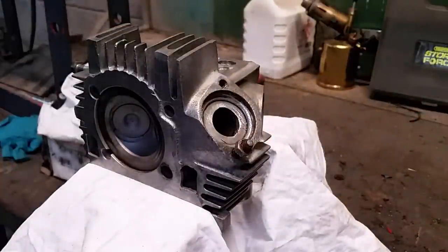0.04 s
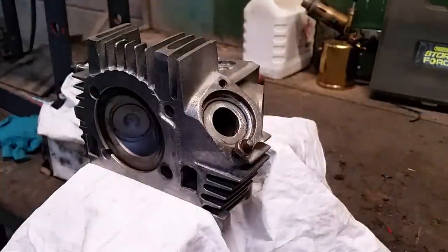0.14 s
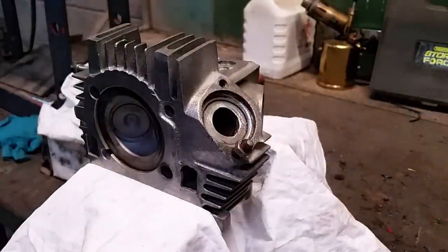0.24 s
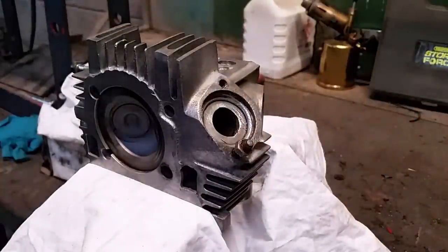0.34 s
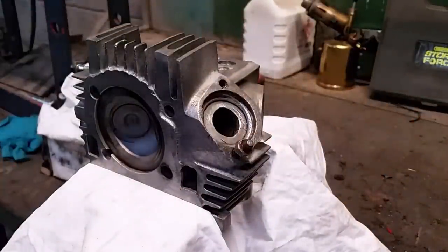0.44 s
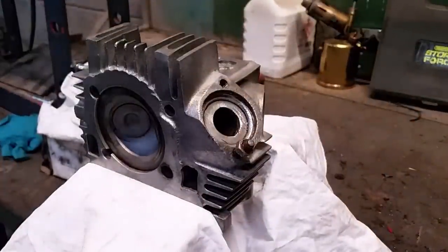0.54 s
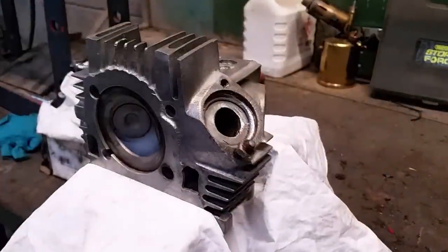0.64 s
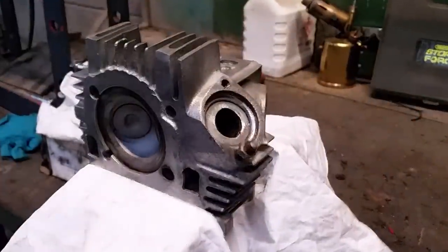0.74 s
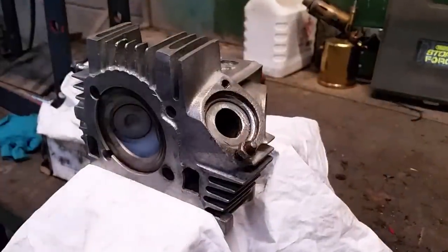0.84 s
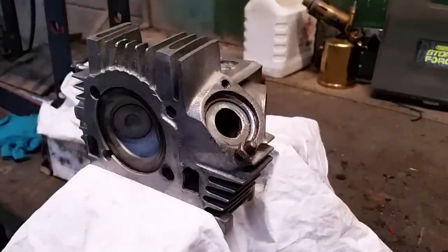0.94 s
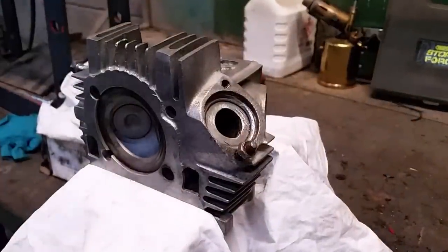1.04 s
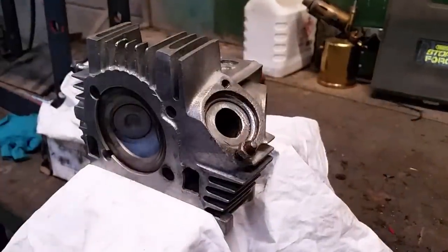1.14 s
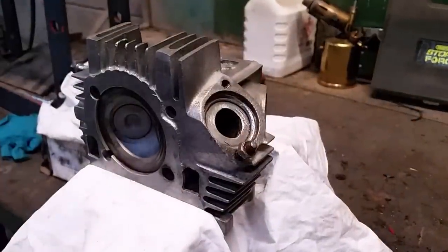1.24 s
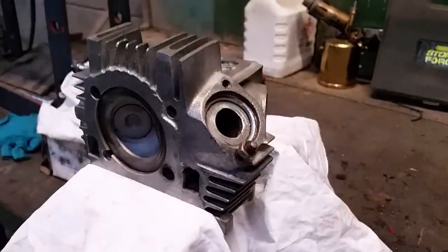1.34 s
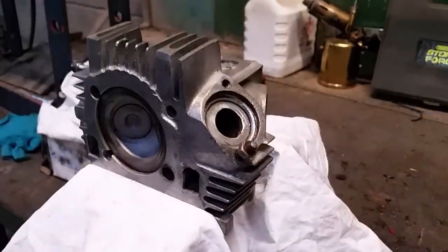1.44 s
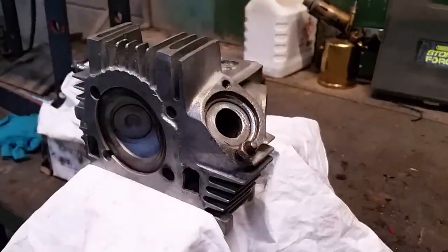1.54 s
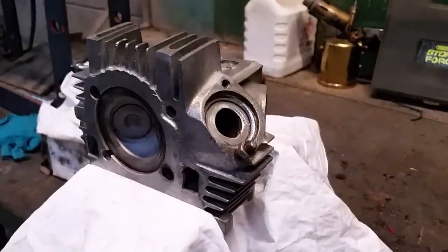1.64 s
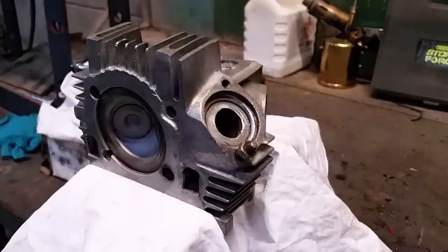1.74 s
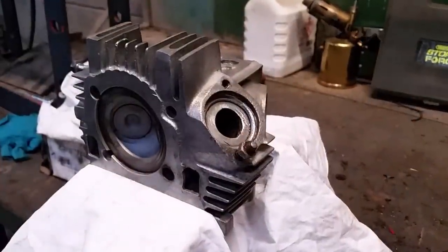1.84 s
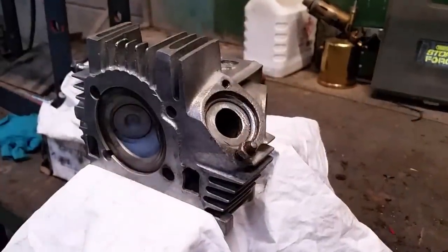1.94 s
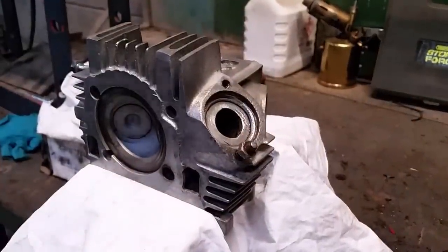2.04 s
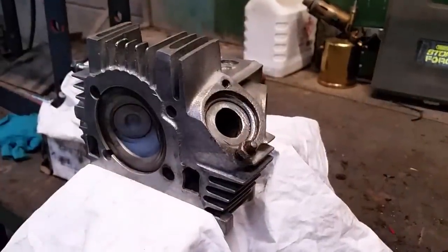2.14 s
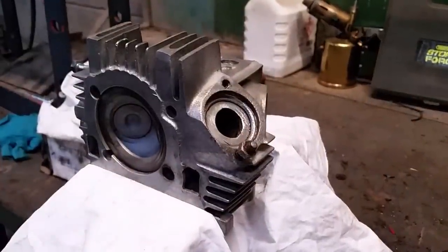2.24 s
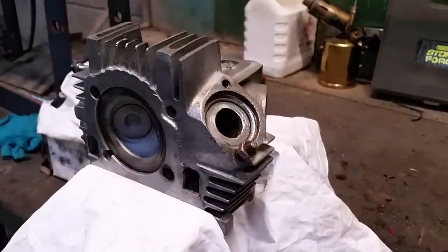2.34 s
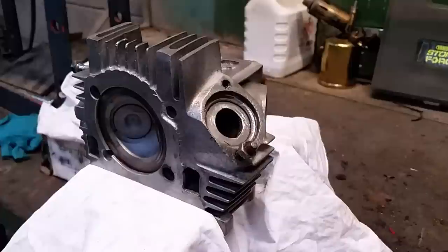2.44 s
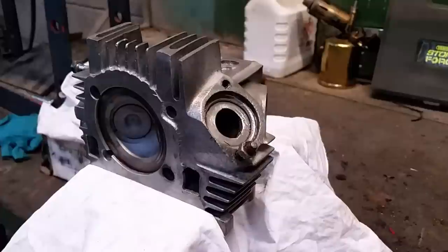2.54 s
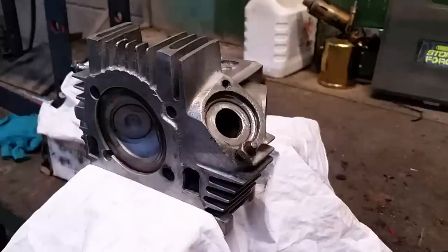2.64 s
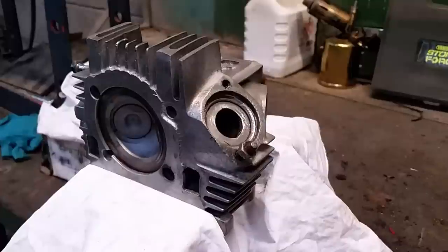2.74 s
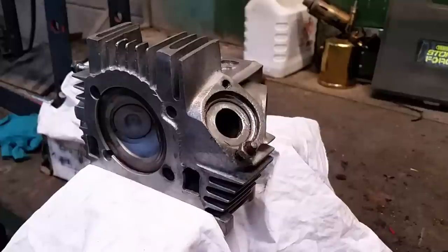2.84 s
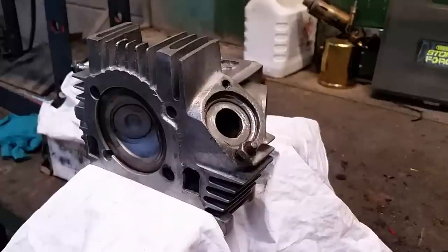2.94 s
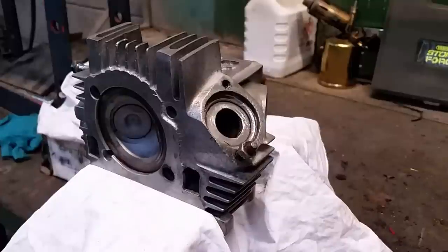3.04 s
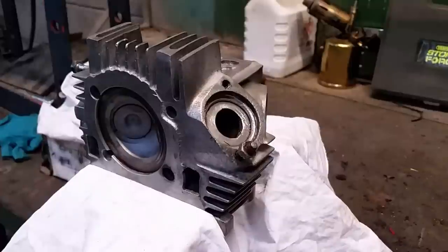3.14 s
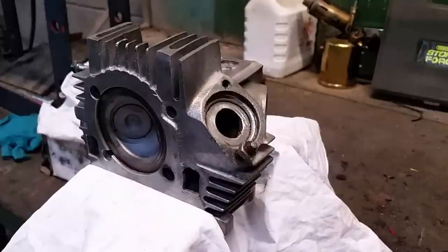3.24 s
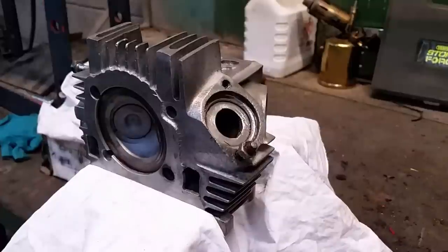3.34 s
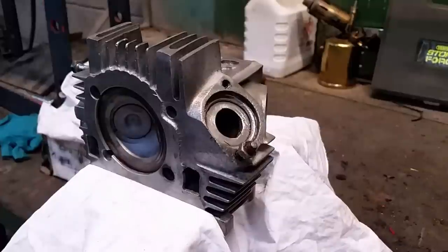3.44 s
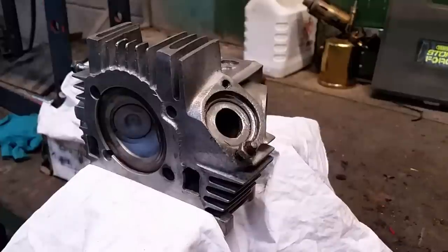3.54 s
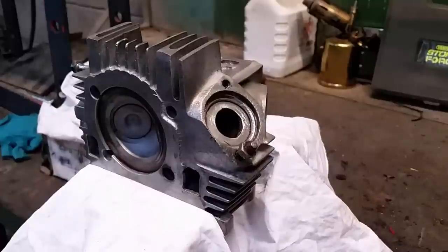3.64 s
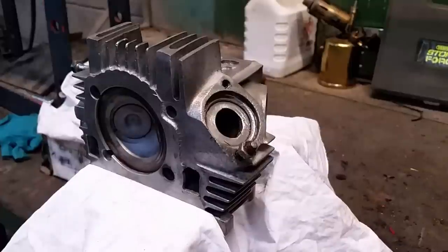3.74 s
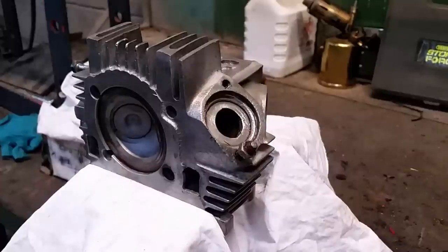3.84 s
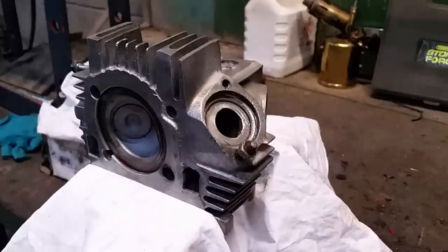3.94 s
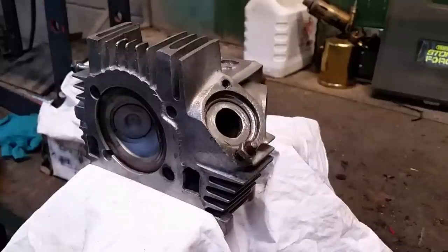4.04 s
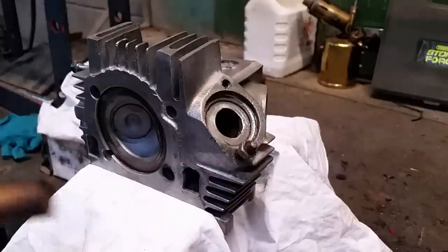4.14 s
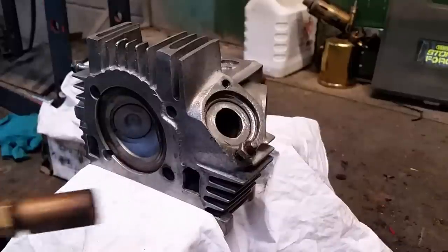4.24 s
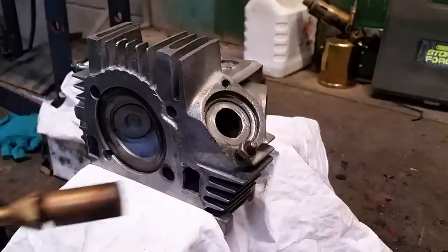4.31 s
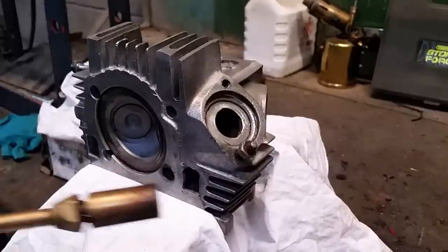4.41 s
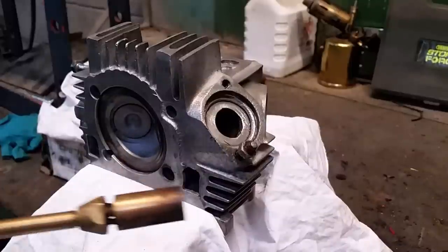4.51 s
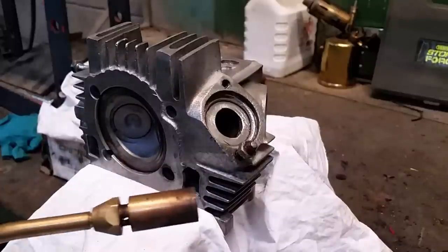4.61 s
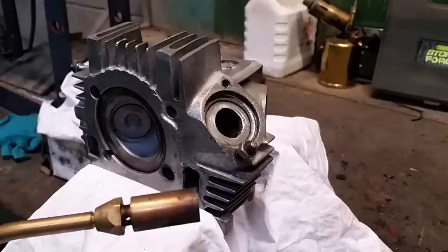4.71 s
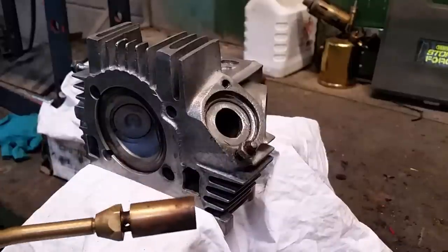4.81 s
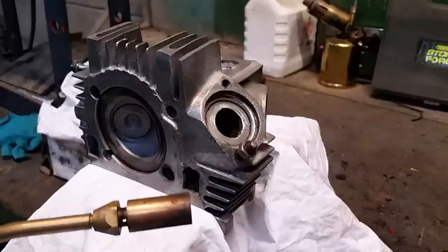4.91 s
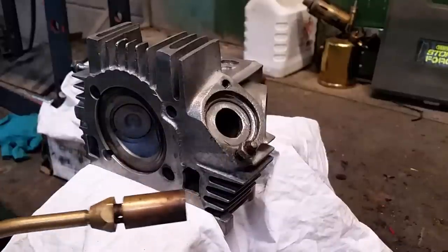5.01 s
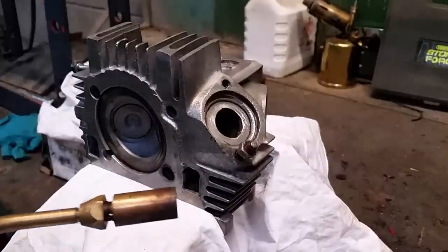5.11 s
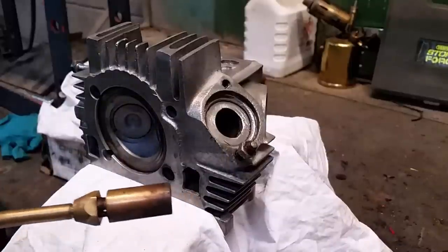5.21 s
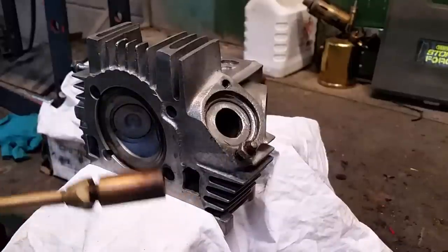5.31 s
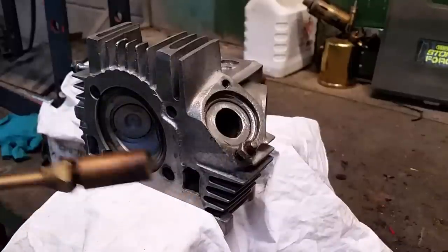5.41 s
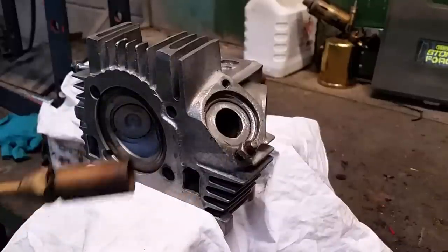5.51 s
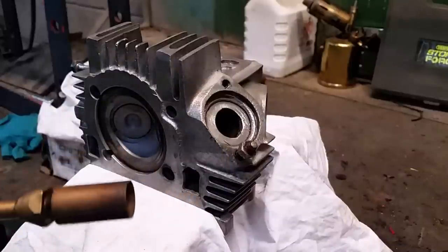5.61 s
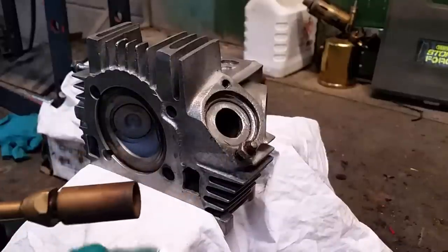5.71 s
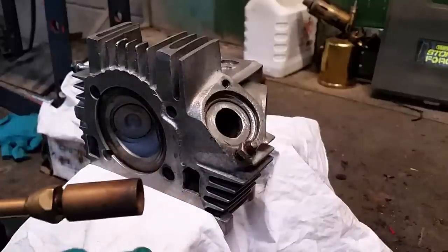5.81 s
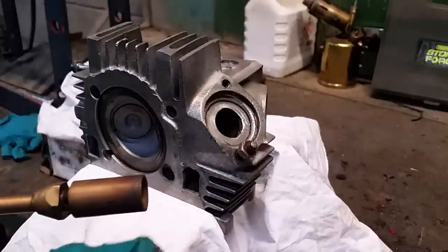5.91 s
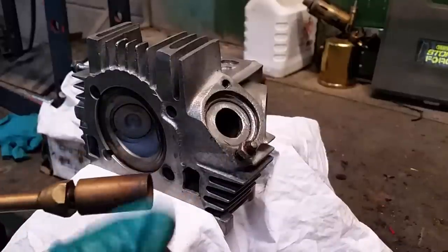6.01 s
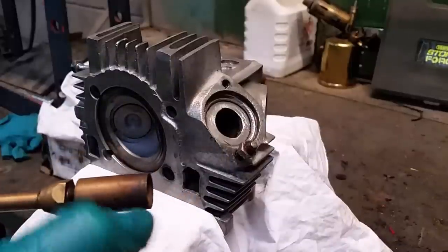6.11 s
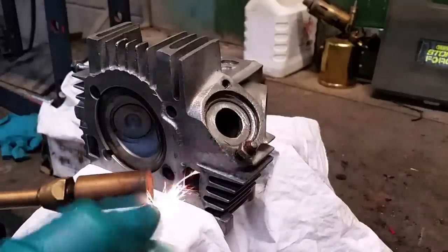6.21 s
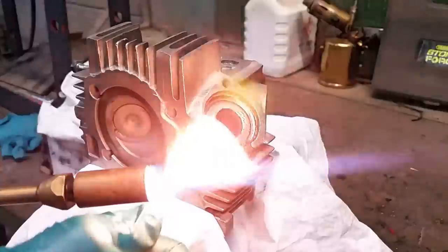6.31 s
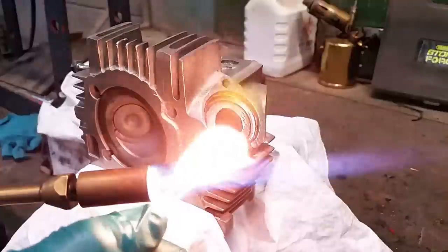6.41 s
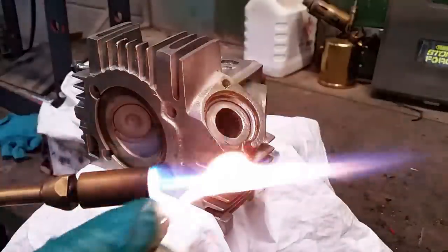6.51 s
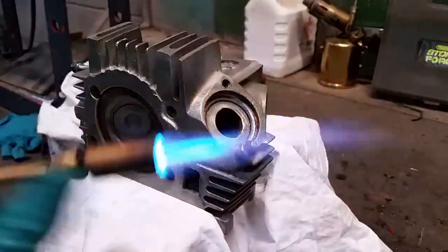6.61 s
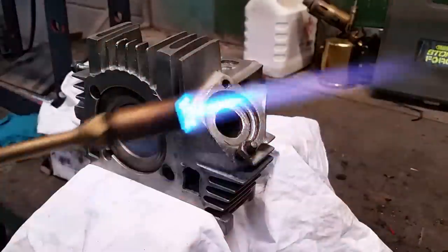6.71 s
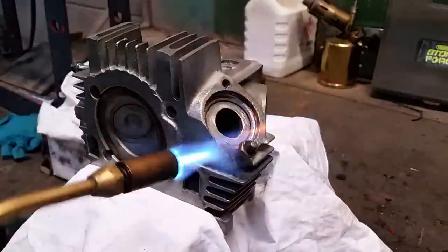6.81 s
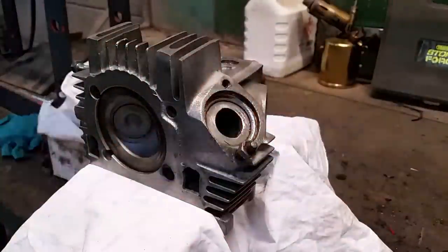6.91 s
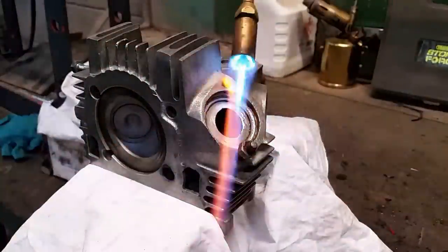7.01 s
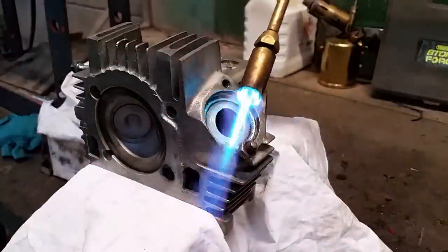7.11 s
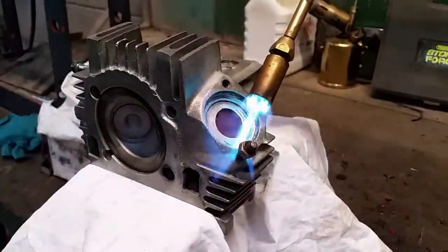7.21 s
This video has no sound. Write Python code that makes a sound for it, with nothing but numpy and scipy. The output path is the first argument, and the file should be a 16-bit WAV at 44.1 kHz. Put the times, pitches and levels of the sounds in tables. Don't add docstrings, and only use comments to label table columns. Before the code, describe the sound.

A small workshop with faint low rumble and a short room echo, heard close by in stereo. From 0 to 0.6 s, tiny hard clicks, the sharpest at 0.45. At 0.79 a tool tips with a knock, lands hard on bench boards at 0.86 with an instant rebound, and bounces at 0.93 and 1.0. From 1.15 to 2.9 s, faint glove and cloth rustle, a soft bump at 1.42, a crisp click and light knock at 2.17, little taps. Near quiet until 3.55, when gas begins hissing, swelling to a bright, airy whistle around 4.05. Boot and hose scuffs at 4.25 and 4.85; the hiss sinks until 5.2, then rises strongly by 5.7. A flint scrapes sharply at 5.86 and again at 6.35. At 6.37 the gas catches with a deep pop and becomes a loud, fluttering, broad roar, dipping slightly near 7.0 and continuing to the 7.26 s cut.

```python
import sys
import numpy as np
from scipy import signal
from scipy.fft import rfft, irfft
from scipy.io import wavfile
from scipy.ndimage import uniform_filter1d, map_coordinates

SR = 44100
rng = np.random.default_rng(int(sys.argv[2]) if len(sys.argv) > 2 else 0)


def decibels_to_gain(level_db):
    exponent = np.asarray(level_db, float) / 20
    return 10 ** exponent


def dump_mix(stems):
    frames = np.atleast_2d(stems).T
    limited = np.clip(frames, -1, 1)
    pcm = np.round(limited * 32767).astype(np.int16)
    wavfile.write(sys.argv[1], SR, pcm)


N = 320166
T = np.arange(N) / SR


def shape(x, table, top=0):
    hz = np.maximum(np.fft.rfftfreq(x.shape[-1], 1 / SR), 1)
    f, db = np.transpose(table)
    gain = decibels_to_gain(np.interp(np.log(hz), np.log(f), db) + top)
    return irfft(rfft(x) * gain, x.shape[-1])


def band(x, lo_hz, hi_hz, order=2):
    sos = signal.butter(order, [lo_hz, min(hi_hz, .45 * SR)], "band", fs=SR, output="sos")
    return signal.sosfilt(sos, x)


def below(x, hz):
    return signal.sosfiltfilt(signal.butter(4, hz, fs=SR, output="sos"), x)


def unit(x, lo_hz, hi_hz):
    return x / np.std(band(x[..., :2 * SR], lo_hz, hi_hz, order=4))


# pitch in Hz, unshared part in dB.
PORT_SIDE = [(30, -14), (100, -20), (200, -22), (500, -21), (1500, -16), (3000, -12), (5000, -7),
             (10000, -12), (15000, -16)]


def pair(x):
    unshared = shape(np.roll(x, len(x) // 3), PORT_SIDE)
    return x + unshared * np.array([[1], [-1]])


def gains(table):
    s, *cols = np.transpose(table)
    return [decibels_to_gain(np.interp(T, s, c, left=-130, right=-130)) for c in cols]


def walk(rate):
    k = int(SR / rate)
    steps = np.repeat(rng.standard_normal(N // k + 1), k)
    w = uniform_filter1d(uniform_filter1d(steps, k), k)[:N]
    return w / w.std()


def grains(rate, scatter_db):
    x = (rng.random(N) < rate / SR) * decibels_to_gain(scatter_db * rng.exponential(size=N))
    return x - x.mean()


def burst(s, rise, tail):
    return np.exp(-np.where(T < s, (s - T) / rise, (T - s) / tail))


def add(out, s, x):
    i = int(s * SR)
    out[:, i:i + x.shape[1]] += x[:, :N - i]


# pitch in Hz, strength in dB per Hz.
SHOP_COLOUR = [(12, -43.5), (20, -21), (27, -21.5), (35, -10.5), (48, -7.5), (70, 0), (87, -23),
               (109, -1.5), (129, -6), (163, -11), (393, -24.5), (505, -25), (1200, -37), (3000, -59),
               (3900, -108.5), (6600, -120)]
# time in seconds, level in dB.
SHOP_LEVEL = [(0.0, -61.5), (0.6, -51.5), (0.95, -59.5), (1.6, -52), (2.04, -57), (2.34, -53),
              (2.55, -57.5), (3.09, -62.5), (3.54, -59.5), (3.8, -53), (4.27, -51), (6.3, -50.5),
              (6.5, -48.5), (7.26, -45.5)]


def shop():
    rumble = pair(shape(rng.standard_normal(N), SHOP_COLOUR))
    return gains(SHOP_LEVEL)[0] * decibels_to_gain(walk(6)) * unit(rumble, 27, 350)


# time in seconds, strength of movement in dB, lightness of touch as treble tilt in dB.
RUSTLE = [
    [(0.0, -88, 1), (0.154, -86, -5), (0.27, -86, -8), (0.4, -82, -1)],
    [(1.15, -80, -4), (1.45, -76.5, -13.5), (1.59, -72.5, 1.8), (1.86, -76, -2.2), (1.95, -93, 7),
     (2.16, -74.5, -8), (2.29, -85, 2), (2.39, -70, -9)],
    [(2.39, -71, -7.5), (2.59, -81.5, -7), (2.76, -80, -1), (2.94, -95, -7), (3.4, -97, 3)],
]


def rustle():
    mid_db = -2
    touch = [[(s, db + tilt, db + tilt / 2 + mid_db, db - tilt) for s, db, tilt in spell] for spell in RUSTLE]
    high, mid, low = (sum(g) for g in zip(*map(gains, touch)))
    crackle = pair(rng.standard_normal(N) * decibels_to_gain(2 * walk(60)))
    edges = ((high, 9000, 15500), (mid, 3000, 7500), (low, 400, 2500))  # gain, lowest Hz, highest Hz
    return sum(g * unit(band(crackle, lo, hi), lo, hi) for g, lo, hi in edges)


# time in seconds, peak in dB, treble lift in dB, share of the room in dB.
CLICKS = [(0.0855, -60, -10, -3), (0.18, -63, -5, -4), (0.2022, -44.5, 18.5, -12),
          (0.209, -50.5, -3.5, 6.5), (0.055, -68, -8, -6), (0.157, -68, -15, -6), (0.247, -62, -10, -6),
          (0.283, -62, -8, -6), (0.289, -60, -8, -6), (0.4174, -41, 17.5, -14), (0.4364, -46, 6, 14),
          (0.449, -33, 10, 6), (0.4541, -22.5, 12.5, -19), (0.568, -44, -18, 7.5), (1.4546, -49, 5, -6),
          (1.4775, -42.5, -3, -0.5), (1.577, -53, -20, 1), (1.6312, -63, 14, -3), (1.8032, -40, -10, -10),
          (1.8496, -54, -15, -4), (2.165, -27, 11, -46.5), (2.4362, -64, 6, -6), (2.4826, -51, -12, -8),
          (2.5031, -50, -14, -8), (2.565, -70, 7.5, -8), (2.6577, -52, 6, -6), (2.691, -56, 0, -6),
          (2.862, -68, 8, -6), (2.9067, -72, 6, -6), (3.85, -46, 6, -6), (4.0114, -36, -4, -6),
          (6.153, -31, -8, -12)]
# time in seconds, peak in dB, treble lift in dB, share of the room in dB.
TAPS = [(0.392, -61, -5, 6.5), (0.783, -52, -12, -6), (0.7865, -38, -10, -5), (0.855, -46, -15, -6),
        (0.8605, -28, -4, -6), (0.8635, -32, 3, 0), (0.931, -38, -4, -8), (0.94, -40, -6, -4),
        (0.9695, -62, 14, -10), (0.9955, -41, -3, -3), (1.0243, -52, 6, -3), (1.0365, -50, -15, -5),
        (1.0825, -58, 11, 5), (1.124, -60, 10, 0), (1.4036, -50, -15, -3), (1.3954, -60, -9, 2),
        (2.1154, -54, -25, -12), (2.472, -56, -1.2, 4.5), (2.552, -46.5, 1, -9), (2.692, -57, -20, -8),
        (2.771, -66, -20, -8)]


def clicks():
    out, t = np.zeros((2, N)), np.arange(1500) / SR
    # rows, level of the 1-3 kHz body in dB, length of a crack in seconds
    for rows, body_db, length in ((CLICKS, -22, .0008), (TAPS, 1.5, .0012)):
        for (s, db, lift_db, wet_db), noise in zip(rows, rng.standard_normal((len(rows), 1500))):
            crack = np.array([noise * t / length * np.exp(-t / length), t == 0])
            parts = band(crack, 9000, 16000), band(crack, 2800, 7500), band(crack, 1000, 2800)
            mix = 0
            for x, part_db in zip(parts, (lift_db, 0, body_db)):
                wet = decibels_to_gain(wet_db) * x[0].std() / x[1].std()
                level = decibels_to_gain(db + part_db) / abs(x[0]).max() * np.array([1, wet])
                mix = mix + level[:, None] * x
            add(out, s, mix)
    return out


# time in seconds, peak in dB, contact in seconds, pitch factor, share of the room in dB.
KNOCKS = [
    (0.7873, -14.5, 0.0011, 0.92, -5.5),
    (0.8582, -22, .0004, 1.05, -6),
    (0.8606, -7, 0.00045, 1.0, -5),
    (0.8632, -13, .0003, 1.05, -10),
    (0.929, -12.5, .0008, 0.9, -6),
    (.940, -19, .001, 0.98, -10),
    (.995, -20, .001, 0.855, -2.5),
    (1.4188, -29, 0.0024, 0.597, -6.5),
    (2.165, -30, 0.0011, 0.66, -15),
]
# pitch in Hz, strength in dB, seconds to fade by 60 dB.
BENCH = [(150, -12, 0.12), (265, -3, 0.08), (372, 7.5, 0.07), (602, -7, 0.06), (802, -1, 0.06),
         (1150, -3, .04), (1375, 5.5, .03), (1690, -0.5, 0.057), (2000, -5, 0.09), (2820, -13, 0.068),
         (3980, -15, 0.06)]


def knocks():
    out, t = np.zeros((2, N)), np.arange(9000) / SR
    hz, db, t60 = np.transpose(BENCH)[:, :, None]
    thud = band(t == 0, 300, 2200, order=3)
    lucks = rng.standard_normal((len(KNOCKS), len(hz), 1))
    for (s, peak_db, contact, pitch, wet_db), luck in zip(KNOCKS, lucks):
        fade_s = t60 * (.96 + .0254 * peak_db)
        modes = decibels_to_gain(db + luck) * np.sin(2 * np.pi * hz * pitch * t) * 1000. ** (-t / fade_s)
        push = t[:600] * np.exp(-t[:600] * 4 / contact)
        blow = -signal.fftconvolve(modes.sum(axis=0), push)[:9000]
        blow = band(blow, 110, 8000, order=1)
        spread = 0.5 * blow + 0.7 * thud * blow.std() / thud.std()
        add(out, s, decibels_to_gain(peak_db) / abs(blow).max() * np.array([blow, decibels_to_gain(wet_db) * spread]))
    return out


SCUFFS = { (9500, 15100): [(1.13, -64, .02, 0.064), (1.575, -65.5, 0.0083, 0.013),
          (1.665, -63, 0.019, 0.018), (1.785, -52.5, 0.015, 0.007), (2.164, -36, 0.0035, 0.0013),
          (2.659, -52.5, 0.009, 0.014), (2.72, -66.5, .01, .015)],
          (3000, 15300): [(1.471, -60, 0.017, 0.016), (2.162, -52, 0.013, 0.018)],
          (3300, 7500): [(1.792, -56, 0.016, 0.013), (2.168, -43, 0.0029, 0.0037),
          (2.49, -69, 0.031, 0.014), (2.665, -63.5, 0.0094, 0.03)],
          (1100, 2600): [(1.41, -63, 0.011, 0.058), (2.37, -65, 0.0078, 0.037), (5.22, -66, .02, .03),
          (4.845, -56, 0.006, 0.03)], (230, 750): [(1.419, -45.5, 0.0067, 0.03),
          (4.838, -45, 0.003, 0.058)], (2300, 3300): [(4.25, -44, .025, .02)],
          (1330, 1530): [(4.25, -50, .025, .015)], (510, 610): [(4.255, -39, .03, .008)],
          (310, 390): [(4.23, -43, .015, .025), (4.845, -44, .006, .03)],
          (500, 1300): [(4.85, -46, .008, .05), (4.245, -50, .03, .02)],
          (130, 320): [(1.425, -44, .008, .04), (4.95, -52, .02, .02)],
          (150, 2400): [(5.866, -41, .003, 0.021), (6.352, -36, 0.0027, 0.0048)], }


def scuffs():
    grit = rng.standard_normal(N) * decibels_to_gain(2 * walk(150))
    out = 0
    for (lo, hi), rows in SCUFFS.items():
        drag = sum(decibels_to_gain(db) * burst(s, rise, tail) for s, db, rise, tail in rows)
        out = out + unit(band(grit, lo, hi), lo, hi) * drag
    return out


def resonance(hz, width_hz):
    sway = below(rng.standard_normal((2, N)), width_hz / 2)
    turn = 2 * np.pi * np.cumsum(hz) / SR
    return sway[0] * np.cos(turn) + sway[1] * np.sin(turn)


# time in seconds, flow as level of the tube in dB, nozzle turned away in dB.
JET = [(3.4, -104, 3), (3.56, -77, 3), (3.8, -67, -5), (3.91, -60.5, -3.5), (4.04, -50.5, -1.5),
       (4.18, -52, -3), (4.44, -54, 0.3), (4.65, -57.5, 3), (4.91, -58, 6.5), (5.16, -61, 2.5),
       (5.38, -56.5, 1.5), (5.47, -50.5, -2.1), (5.64, -43.5, -1.5), (5.77, -40.5, 2), (6.16, -43, -2.5),
       (6.37, -41, 0.7), (6.6, -40.5, .5), (6.8, -42, 1), (6.98, -42, .5), (7.04, -45, 4), (7.26, -44.5, 3)]
# pitch in Hz, strength in dB per Hz.
JET_COLOUR = [(1470, -41), (2500, -22.5), (3530, -21), (4640, -4.5), (5860, -8.5), (6190, -17), (6800, -9),
              (7180, -9), (7950, -23), (9370, -23), (10500, -8.5), (11000, -5), (11700, -11),
              (12800, -11.5), (14200, -11), (15300, -12), (16200, -20)]
# pitch in Hz, strength in dB per Hz.
RUSH_COLOUR = [(150, -13), (250, -2.5), (700, -2), (1400, -9), (3500, -17), (6000, -20.5), (7500, -22),
               (9000, -46)]
# time in seconds, tube, collar and nozzle pitch in Hz.
AIM = [(3.55, 4880, 7250, 11500), (3.8, 4850, 7000, 10900), (4.05, 4880, 7100, 11050),
       (4.35, 4750, 6800, 11000), (4.58, 4880, 6800, 11350), (4.78, 4820, 6750, 11600),
       (5.3, 4890, 7050, 10950), (5.55, 4950, 7000, 10750), (5.8, 4800, 6900, 10800),
       (6.2, 4660, 7000, 11100), (6.55, 4700, 6900, 11250), (7.26, 4700, 6900, 11100)]
# time in seconds, collar over the tube in dB.
GRIP = [(4.1, 1.2), (4.6, -10.5), (5.45, -6), (5.7, -12), (5.97, -3), (6.3, -9)]


def jet():
    s, flow, away = np.transpose(JET)
    flow, away = np.interp(T, s, flow, left=-130), np.interp(T, s, away)
    lit = T >= POP[0][0]
    whistle = decibels_to_gain(flow + 8 - away)
    tube = decibels_to_gain(flow - 5 * lit)
    grip = np.interp(T, *np.transpose(GRIP))
    collar = decibels_to_gain(flow + grip - 3 * lit + 1.5 * walk(5))
    wash = np.minimum(burst(4.06, .05, 99), burst(4.06 + .27, 99, .15))
    opening = np.clip((T - s[1]) / 0.44, 0, 1) ** 2
    rush = decibels_to_gain(-41.5 + .5 * flow) * opening + decibels_to_gain(-56.5) * wash

    turns, *bends = np.transpose(AIM)
    rings = []
    for hz, width_hz in zip(bends, (700, 750, 850)):
        centre = np.interp(T, turns, hz) * (1 + .008 * walk(6))
        rings.append(resonance(centre, width_hz))
    hiss = shape(rng.standard_normal((4, N)), JET_COLOUR)
    bounce_ms = .72 - .058 * (T - s[0]) + .03 * walk(2)
    late = np.arange(N) - bounce_ms * SR / 1000
    high = hiss[2] + (.36 - .2 * lit) * map_coordinates(hiss[2], [late], order=3)
    skirts = below(hiss[0], 6100), band(hiss[1], 6000, 7600, order=4), band(high, 9900, 17000, order=5)

    broad = np.clip((whistle / decibels_to_gain(-56)) ** .65, .12, 1)
    gap = unit(pair(band(hiss[3], 7830, 10340, order=4)), 7400, 10000)
    out = whistle ** 1.495 * decibels_to_gain(1.5 + .55 * grip) * gap * ~lit
    clear = decibels_to_gain(-.1 * np.maximum(flow + 55, 0))
    for gain, ring, skirt, share in zip((tube, collar, whistle), rings, skirts, (.7, .6, .55)):
        flicker = decibels_to_gain(.7 * walk(25))
        sung = share * clear * ring / ring.std()
        out = out + gain * flicker * pair(sung + 0.78 * broad * skirt / skirt.std())
    air = unit(pair(shape(rng.standard_normal(N), RUSH_COLOUR)), 1360, 3400)
    flutter = decibels_to_gain(1.2 * walk(40))
    return out + rush * flutter * ~lit * air


# time in seconds, level in dB, run-up in seconds, tail in seconds.
FLINT = [
    (5.859, -27, .006, .01),
    (5.8622, -14, .0008, .0025),
    (6.3445, -22, .005, .002),
    (6.349, -19, .003, .004),
]
# pitch in Hz, strength in dB per Hz.
FLINT_COLOUR = [(88, -10), (150, -14), (1700, -28), (2200, -25.5), (4900, -11), (5850, -19), (6980, -13.5),
                (9000, -13), (10900, -10.5), (14400, -4), (16200, -33)]


def flint():
    grit = grains(15000, scatter_db=1.5)
    strokes = sum(decibels_to_gain(db) * burst(s, rise, tail) for s, db, rise, tail in FLINT)
    return unit(shape(grit, FLINT_COLOUR), 150, 15800) * strokes


# time in seconds, peak in dB, pitch in Hz, decay in seconds.
POP = [
    (6.369, -16, 65, .014),
    (6.377, -15, 300, .002),
    (6.3895, -11, 170, .0025),
]


def pop():
    out = .1 * burst(POP[0][0], .002, 1e-5)
    for s, db, hz, decay in POP:
        age = np.maximum(T - s, 0)
        out = out - decibels_to_gain(db) * (T >= s) * np.exp(-age / decay) * np.cos(2 * np.pi * hz * age)
    return below(out, 1200)


# time in seconds, roar in dB, upper part over the roar in dB.
FLAME = [(6.366, -50, -4), (6.372, -22.5, -8), (6.39, -20, -5), (6.4, -24.5, -4), (6.456, -22, -4),
         (6.6, -23, -4), (6.72, -22, -5), (6.86, -23, -6), (6.97, -23.5, -7), (7.02, -26, -6),
         (7.07, -25, -4), (7.116, -24, -5), (7.19, -23, -6), (7.26, -22, -6)]
# pitch in Hz, strength in dB per Hz.
FLAME_COLOUR = [(15, -53), (25, -51), (85, -15.5), (160, -2.5), (532, -3), (619, -1.5), (701, 2),
                (775, -1.5), (1020, -1), (1280, -6.5), (2950, -10.5), (3400, -15.5), (5620, -24),
                (6370, -26.5), (7300, -29), (8300, -28), (9300, -33), (13000, -34), (15500, -38),
                (22000, -120)]


def flame():
    roar, bright = gains([(s, db, db + upper) for s, db, upper in FLAME])
    puffs = grains(1800, scatter_db=2.2)
    turbulence = rng.standard_normal(N)
    burn = pair(shape(-.85 * puffs / puffs.std() + .5 * turbulence, FLAME_COLOUR))
    low = below(burn, 1460)
    edge = burn - below(burn, 5800)
    patches = decibels_to_gain(2.5 * walk(7) + 2 - 4 * (T - FLAME[0][0]))
    burn = burn + (patches - 1) * edge
    flutter = decibels_to_gain([walk(40), .6 * walk(45)])
    body = roar * flutter[0] * unit(low, 210, 1300)
    return body + bright * flutter[1] * unit(burn - low, 2000, 3930)


# pitch in Hz, seconds to fade by 60 dB, level in dB.
ROOM = [(150, 0.63, -26), (403, 0.69, -28.5), (993, 0.81, -31), (2160, 0.7, -32), (4800, 0.61, -31.5),
        (11120, 0.49, -30)]


def room(direct, spread):
    wall_s = .011
    t = np.arange(SR) / SR
    noise = rng.standard_normal((2, SR))
    noise = noise[0] + shape(noise[1], PORT_SIDE, top=4.1) * np.array([[1], [-1]])
    tail = sum(decibels_to_gain(db) * band(noise, hz / 1.98, hz * 1.434) * 1000. ** (-t / t60) for hz, t60, db in ROOM)
    tail = tail * (np.clip(t / wall_s, 0, 1) ** 2 + .5 * np.exp(-((t - wall_s) / .002) ** 2))
    return direct + signal.fftconvolve(spread[None], tail)[:, :N]


# pitch in Hz, gain in dB.
CASE = [(3000, 0), (5000, 1.5), (7000, 1), (8600, -6.5), (10500, 0.5), (15000, -1.5), (16300, -8)]


def scene():
    close = (flint() + scuffs()) * decibels_to_gain([[0], [-13]])
    handling = room(*(close + clicks() + knocks())) + rustle()
    return jet() + pop() + flame() + shop() + shape(handling, CASE)


def roll_off(x):
    return signal.sosfilt(signal.butter(12, 16350, fs=SR, output="sos"), x)


# pitch in Hz, left minus right in dB.
PORT_BALANCE = [(100, 0), (1000, .3), (2400, 1.0), (4000, 7.5), (5200, 7.5), (6800, 1.0), (9000, -2),
                (15000, -.2)]


def record(dry):
    f, db = np.transpose(PORT_BALANCE)
    ports = np.array([shape(x, np.transpose([f, side * db / 2])) for x, side in zip(dry, (1, -1))])
    ports = .6 * np.tanh(ports / .6)
    ports = signal.sosfilt(signal.butter(1, 30, "high", fs=SR, output="sos"), ports)
    ports = signal.sosfiltfilt(signal.ellip(8, .1, 40, 15650, fs=SR, output="sos"), ports)
    return roll_off(ports)


dry = scene()
out = record(dry)
dump_mix(out)
```